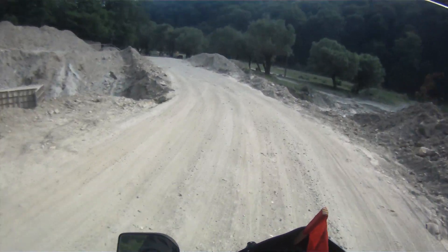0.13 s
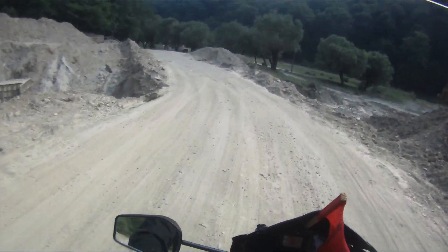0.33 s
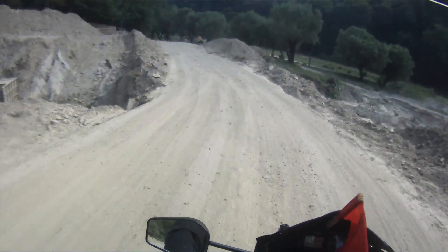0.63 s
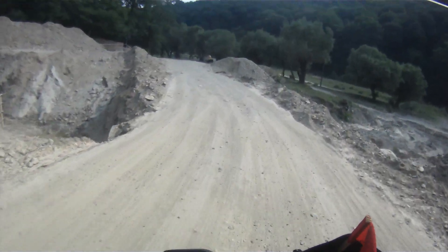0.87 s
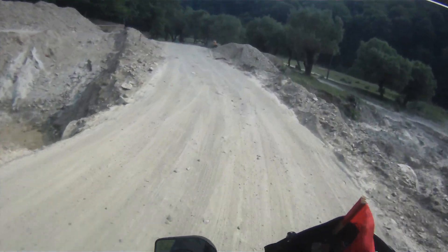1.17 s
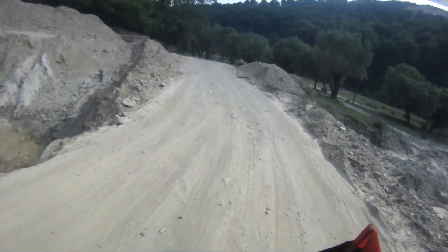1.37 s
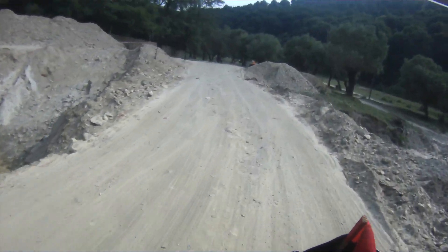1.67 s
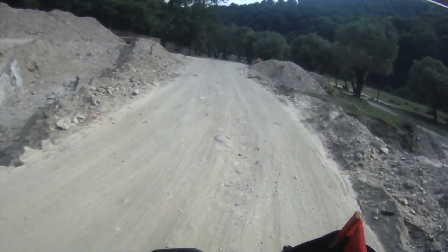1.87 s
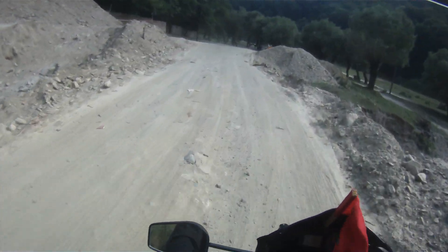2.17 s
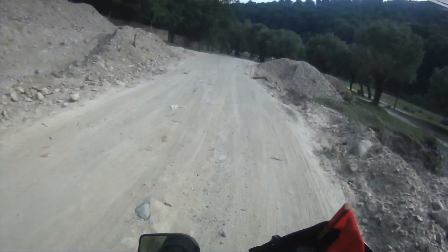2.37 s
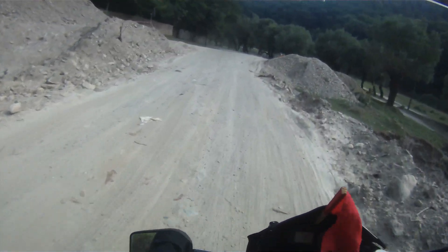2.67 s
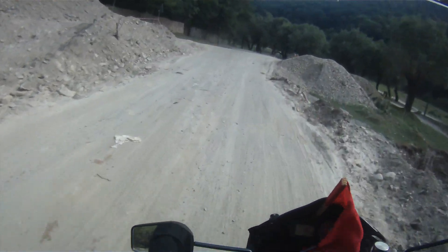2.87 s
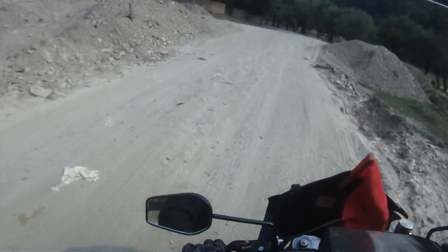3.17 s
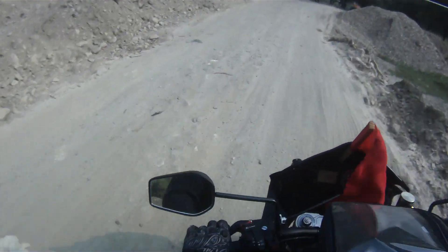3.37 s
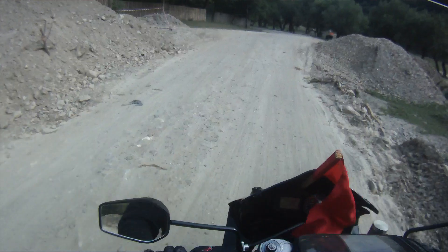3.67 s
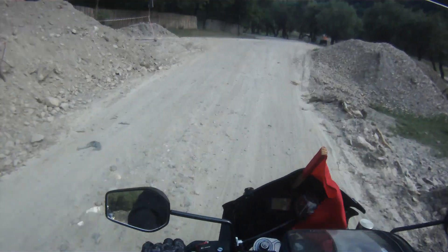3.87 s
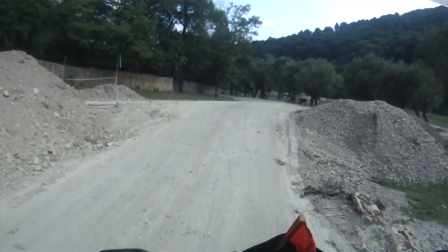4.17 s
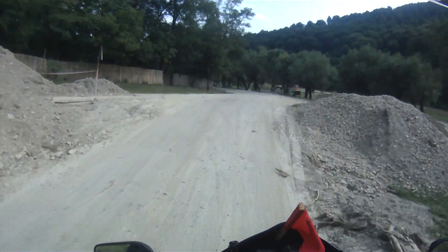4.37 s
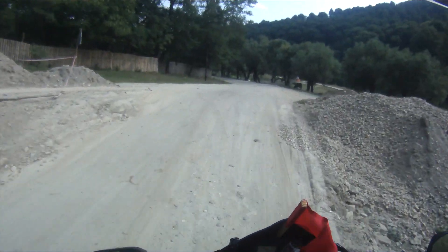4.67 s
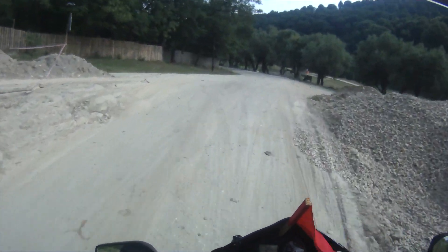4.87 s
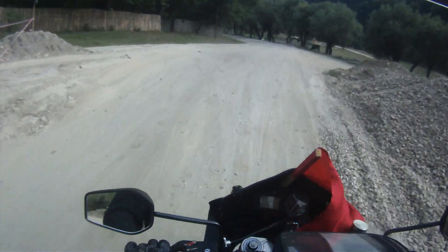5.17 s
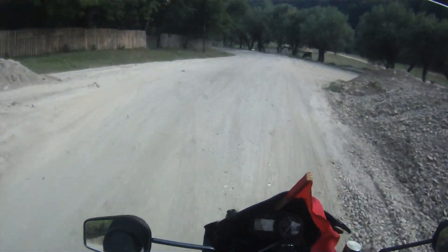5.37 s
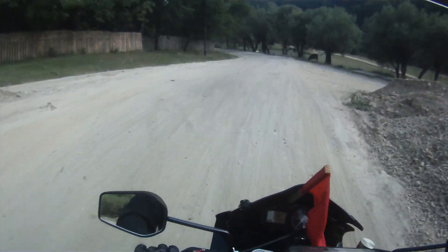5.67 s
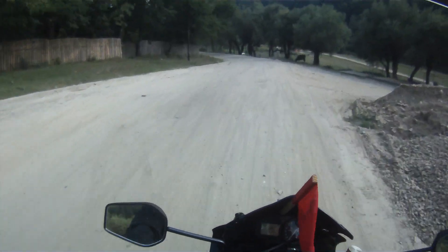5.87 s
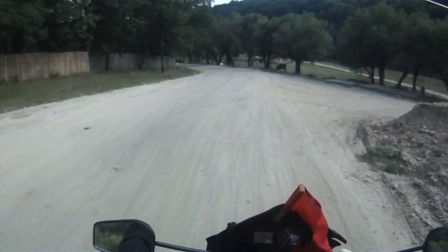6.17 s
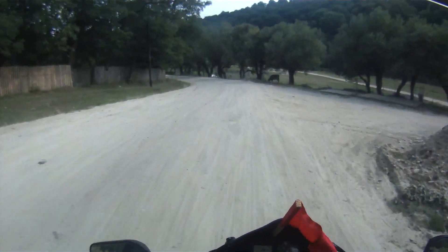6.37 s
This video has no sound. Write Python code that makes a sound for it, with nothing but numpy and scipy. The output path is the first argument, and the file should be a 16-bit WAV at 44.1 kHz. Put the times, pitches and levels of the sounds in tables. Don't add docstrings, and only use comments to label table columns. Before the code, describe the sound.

A motorcycle putters and stumbles along a gravel road, then pulls cleanly to a higher note before dropping off amid rattling bumps.

```python
import sys
import numpy as np
from scipy import signal
from scipy.fft import rfft, irfft, next_fast_len
from scipy.io import wavfile
from scipy.ndimage import uniform_filter1d, map_coordinates

SR = 44100
rng = np.random.default_rng(int(sys.argv[2]) if len(sys.argv) > 2 else 0)


def pcm_store(signal):
    levels = np.round(np.clip(np.atleast_2d(signal), -1, 1) * 32767)
    wavfile.write(sys.argv[1], SR, levels.astype(np.int16).T)


def field_ratio(decibels):
    return 10 ** (np.asarray(decibels, dtype=float) / 20)


N = 287084

# time in seconds, firings a second.
ENGINE_SPEED = [(0.0, 42.46), (0.667, 42.92), (1.068, 44.4), (1.139, 39.85), (1.93, 42.85), (2.009, 41.74),
                (2.173, 44.76), (3.287, 55.64), (3.523, 53.69), (3.618, 66.1), (3.767, 70.32),
                (4.041, 69.88), (4.223, 63.98), (4.353, 67.64), (5.296, 73.74), (5.373, 72.61),
                (6.084, 72.08), (6.51, 35.8)]
FIRST_TURN = .3778
# time in seconds, peak of a puff in dB, lead of the stronger cylinder in dB.
THROTTLE = [(0.0, -15, -0.8), (0.5, -15, -1.6), (1.1, -17.5, 2.5), (1.9, -16.5, 1.2), (2.6, -15, 0),
            (3.1, -14, 0.7), (3.5, -15, -1.6), (3.65, -11.5, 1), (4.05, -13.5, 0.5), (4.25, -17.5, 1.1),
            (4.45, -14.5, 1.5), (5.13, -16.5, 1.6), (5.19, -13.5, 3), (5.45, -13.5, 0), (6.122, -14, 1),
            (6.14, -29, 5.5), (6.3, -16.5, 0.5), (6.51, -19.5, 1.4)]
# time in seconds, change in dB.
ODD_FIRINGS = [(.062, -7), (0.131, -13), (.183, 4), (.295, 8), (.342, -5), (0.436, -8), (.668, 7),
               (.765, 4), (0.809, -6), (1.036, -8), (1.105, -7), (1.229, 6), (1.254, 8), (1.353, -5),
               (1.378, 6), (1.426, -9), (1.643, 5), (1.834, 5), (1.928, -6), (2.184, 6), (2.61, -5),
               (2.651, 4), (2.77, -7), (2.926, -6), (3.002, 9), (3.023, 3), (3.041, 4), (3.189, -4),
               (3.225, -14), (3.243, 7), (3.298, -4), (3.315, -8), (3.333, 5), (3.37, 7), (3.387, 9),
               (3.46, -9), (3.499, 4), (3.516, -8), (3.535, 10), (3.793, 3), (3.85, 3), (4.469, -3),
               (4.571, 3), (5.148, -7), (5.162, -30), (5.177, 2), (5.245, 3), (5.451, -3), (5.477, -6),
               (5.7, 4), (5.85, 3), (6.128, -20), (6.144, -8), (6.33, -6), (6.348, -3), (6.369, 5),
               (6.391, -4), (6.416, 3), (6.461, -24), (6.503, 2)]
# time in seconds, change in dB.
MORE_ODD_FIRINGS = [(.159, -5), (.39, -0.5), (.484, 2), (.558, 1.5), (.623, -1.5), (.742, -1), (.926, -2.5),
                    (.949, 5), (1.058, 0), (1.08, -4), (1.23, 6), (1.254, -1), (1.476, -5), (1.574, -1),
                    (1.62, 3), (1.718, 1.5), (1.764, 5), (1.996, 2), (2.093, -1), (2.274, 2), (2.381, 4),
                    (2.402, 1.5), (2.672, -2.5), (2.73, 2.5), (2.949, 0), (3.096, 8), (3.134, -4.5),
                    (3.298, 0), (3.482, -1), (3.554, 4), (3.571, 1.5), (3.634, -1.5), (3.648, -2),
                    (3.663, -2.5), (3.678, -2), (4.276, 1.5), (4.305, -2.5), (4.321, -0.5), (4.398, 2),
                    (4.543, -2.5), (4.571, -4.5), (4.787, -1.5), (4.857, 1), (4.886, 0), (4.898, 3.5),
                    (5.065, 4), (5.136, 2), (5.204, 4), (5.233, 5), (5.299, -4.5), (5.326, -2.5), (5.423, 3),
                    (5.52, 2), (5.562, 2.5), (5.687, -2), (5.99, -0.5), (6.047, -1.5), (6.061, 0.5),
                    (6.102, -5), (6.182, -4)]
# pitch at idle in Hz, rise in Hz per firing a second, rise in ms, fall in ms.
MUFFLER = (259.2, 0.9, 3.01, 3.17)
# level in dB, multiple of the muffler pitch, width in ms.
VALVE_RASP = (-22, 2.6, 0.33)
# multiple of the firing rate, dB against the puff, lag in turns,
# pipe delay in ms, dB per firing a second above cruise.
LOW_ORDERS = [
    (1, -21, -0.31, 7.1, 0),
    (2, -20.5, -0.0032, 2.8, -1),
]
LOW_DB = (-1, 0.3, -2)
# pitch in Hz, level in dB per Hz.
BOOM_COLOUR = [(30, -44.5), (45, -16.5), (65, -11.5), (110, 5), (150, 3.5), (210, -9.5), (300, -19),
               (400, -53)]
BOOM_DB = (-37.5, -44.5, -40.5)
# time in seconds, share of the stumble from 0 to 1,
# surge of the shaft in firings.
HUNTING = [
    (0, 1, .05),
    (1.05, 1, .095),
    (1.15, 1, .03),
    (2, 1, -.01),
    (2.3, 1, .06),
    (2.7, 1, -.05),
    (3.5, 1, .01),
    (3.6, 0, 0),
    (6.51, 0, 0),
]
STUMBLE_DB = [
    1.5,
    -.7,
    .4,
    -2.5,
    1.8,
    -12,
    -6.5,
    -.6,
]
SLIP_S, SLIP = 3.04, 4
SURGE_LAG, SCATTER_DB = .31, 1.4
# opens, is open, starts to close, is shut, each in seconds.
PULL = (3.55, 3.7, 6.1, 6.2)
# depth in firings, rate in Hz, lag in turns.
CHAIN_ROCK = (.049, 1.9877, .309)
JUDDER = (.008, 9)
# time in seconds, lead in firings.
RUTS = [(0.02, 0.044), (0.13, -0.128), (0.24, -0.063), (0.35, 0.095), (0.46, -0.019), (0.57, -0.027),
        (0.68, 0.03), (0.79, -0.012), (0.9, 0.033), (1.01, -0.06), (1.12, 0.064), (1.23, -0.015),
        (1.34, 0.054), (1.45, -0.028), (1.56, -0.053), (1.66, 0.115), (1.77, -0.056), (1.88, -0.019),
        (1.99, 0.012), (2.1, 0.016), (2.21, -0.014), (2.43, -0.009), (2.54, -0.053), (2.65, 0.037),
        (2.76, 0.006), (2.87, -0.078), (2.98, -0.047), (3.09, 0.01), (3.31, -0.009), (3.53, -0.021),
        (3.64, -0.004), (3.75, -0.028), (3.86, -0.006), (3.97, -0.026), (4.08, -0.0), (4.19, -0.021),
        (4.3, -0.009), (4.41, 0.0), (4.52, 0.031), (4.63, -0.011), (4.74, -0.047), (4.85, -0.035),
        (4.95, -0.031), (5.06, -0.039), (5.17, 0.004), (5.28, -0.055), (5.39, -0.01), (5.5, -0.032),
        (5.61, -0.04), (5.72, -0.096), (5.83, 0.023), (5.94, -0.01), (6.05, -0.097), (6.16, 0.02),
        (6.27, 0.023), (6.31, 0.0), (6.36, 0.17), (6.425, -0.15), (6.48, 0.0), (6.51, 0.6)]
# time in seconds, roar in dB.
ROUGHNESS = [(0, -31.5), (.6, -31), (.95, -32.5), (1.3, -34), (2, -33), (2.55, -31.5), (2.88, -31),
             (3.5, -32), (3.79, -40), (4.17, -33.5), (4.97, -31.5), (5.24, -30.5), (5.48, -34),
             (5.97, -34.5), (6.16, -31.5), (6.33, -29), (6.51, -28.5)]
AVERAGE_ROAD_DB = -34.5
# pitch in Hz, level in dB per Hz.
ROAR_COLOUR = [(100, -31.5), (190, -4.5), (300, 1.5), (450, -3), (600, -7), (850, -11.5), (1300, -19),
               (2000, -38), (4000, -65.5)]
# pitch in Hz, level in dB per Hz.
CRUNCH_COLOUR = [(500, -27.5), (1000, 1.5), (1700, 2.5), (2100, -2), (2700, -13.5), (3200, -19),
                 (3800, -28.5), (5000, -47.5), (8000, -71)]
# pitch in Hz, level in dB per Hz.
HISS_COLOUR = [(2600, -29), (3050, 5.5), (3250, 12), (3500, -0.5), (4200, -1.5), (4950, -6.5), (5300, -4),
               (5500, 0.5), (5750, -2.5), (6200, -3), (6700, -10.5), (7500, -15.5), (9000, -32)]
# pitch in Hz, level in dB per Hz.
AIR_COLOUR = [(5000, -19), (7000, -2), (9500, -3.5), (12000, -4.5), (15200, -12.5), (15500, -49.5)]
# coasting, pulling and shut off in dB, then dB per dB of road.
CRUNCH_LAW = (-50, -50.5, -49, 0.5)
HISS_LAW = (-71.5, -74.5, -73, -0.03)
AIR_LAW = (-79, -83.5, -83, 0.16)
# grains a second, spread of size in dB, share from 0 to 1.
ROAR_GRAINS = (900, 2.5, .16)
GAP = .38
TIGHT = .35
CLEARED = (.15, 0, .4)
MISSED_DB = 30
# time in seconds, peak in dB, pitch in Hz, brightness in dB,
# time to fade by 60 dB in seconds.
BUMPS = [(0.392, -27.5, 630, -8.5, 0.12), (.605, -22.5, 800, -21, 0.068), (1.087, -22.5, 770, -10, 0.053),
         (1.117, -24, 960, -5, .03), (1.132, -15.5, 500, -10.5, 0.068), (1.1379, -14.5, 755, -8.5, 0.037),
         (1.143, -14, 478, -5.5, 0.047), (1.183, -22, 646, -19, 0.036), (1.4207, -23, 900, 3, 0.028),
         (1.423, -15.5, 596, -13, 0.16), (1.594, -20, 507, 8, .04), (1.651, -16, 610, -9.5, 0.04),
         (2.061, -23, 600, -5, 0.02), (2.576, -23.5, 525, -12, 0.02), (2.71, -20.5, 600, -10.5, 0.18),
         (2.885, -20.5, 530, -19.5, 0.16), (3.525, -30.5, 580, -11, 0.13), (4.0898, -23.5, 584, -1, 0.03),
         (4.353, -21.5, 600, 0, 0.028), (4.661, -19.5, 550, -3, 0.03), (4.7684, -17.5, 543, -8, 0.04),
         (5.415, -17, 536, -15.5, 0.045), (6.347, -16.5, 565, -5, 0.1), (6.361, -19, 630, -1, .08),
         (6.377, -16, 606, -7.5, 0.086), (6.392, -14.5, 716, -4, 0.13), (6.404, -17, 800, -1.5, .08),
         (6.419, -20, 650, -3, .06), (6.436, -26, 600, -5, .04), (6.458, -25.5, 626, -4.5, 0.05),
         (6.471, -17, 645, -3, 0.061)]
KNOCK = 3
STEEL_DB, JOLTED_DB = -61, -52
JOLTS = [
    1.412,
    1.649,
    6.394,
]
# time in seconds, peak in dB, 60 dB fade in seconds, top pitch in Hz.
TICKS = [(.487, -40, 0.0088, 7450), (.709, -36.5, 0.0098, 12000), (1.236, -49, 0.025, 11040),
         (3.1334, -23.5, 0.0013, 15300), (2.501, -52.5, 0.0069, 6920), (3.386, -47, 0.012, 9000),
         (3.5556, -21.5, 0.0012, 13200), (1.649, -51.5, .01, 6960), (6.224, -48.5, .02, 6500),
         (6.395, -44.5, 0.022, 7200), (6.405, -47.5, .03, 6450), (6.5096, -17.5, 0.004, 40400)]
# time in seconds, peak in dB, pitch in Hz, width in Hz,
# 60 dB fade in seconds.
GRAVEL_SNAPS = [(.597, -37, 2100, 500, .03), (.835, -58, 6000, 1500, .02), (1.142, -58, 5500, 1200, .03),
                (1.238, -40, 1900, 700, .03), (1.239, -60, 6500, 2500, .02), (1.4205, -37, 2600, 1300, .03),
                (1.421, -56, 5800, 1100, .03), (.484, -50, 5400, 2500, .012), (1.651, -51, 5750, 900, .025),
                (1.651, -46, 2700, 1300, .02), (3.6267, -48, 3300, 1500, .015),
                (4.064, -51, 3300, 1500, .015), (5.196, -51, 3400, 1200, .02),
                (5.295, -60, 6000, 1500, .02), (6.394, -44, 3200, 1800, .025)]
# time in seconds, peak in dB.
VALVE_TAPS = [(0.0338, -49), (0.1273, -49), (0.2242, -51), (0.3142, -52), (0.4095, -48.5), (0.5044, -49.5),
              (0.5975, -47), (0.6883, -47), (0.7831, -49.5), (0.8734, -50), (0.9673, -49), (1.0545, -55),
              (1.1523, -46), (1.2494, -54), (1.3394, -50.5), (1.5474, -52), (1.6402, -50.5),
              (1.7374, -49.5), (1.8323, -51.5), (1.925, -52), (2.0203, -50), (2.1121, -47.5),
              (2.2036, -51.5), (2.2907, -49.5), (2.375, -51.5), (2.4632, -50), (2.5446, -51),
              (2.627, -50.5), (2.7048, -53), (2.7861, -49.5), (2.865, -50), (2.9404, -56), (3.018, -52.5),
              (3.0926, -52), (3.239, -53), (3.3104, -50), (3.3837, -48.5), (3.457, -51)]
# trim in dB, pitch in Hz, width in Hz, 60 dB fade in seconds.
VALVE_RING = (1.5, 3300, 900, .016)
# start in seconds, length in seconds, pitch in Hz, level in dB.
BUZZES = [(0, .1, 985, -41), (.1, .04, 913, -41), (.15, .04, 997, -45), (.18, .12, 1104, -39.5),
          (0.314, .14, 960, -41), (0.505, 0.1, 961, -41), (0.583, 0.11, 1100, -42), (.67, 0.12, 957, -39.5),
          (.75, 0.11, 1100, -35), (0.882, .07, 1030, -38), (.94, .11, 1100, -33.5),
          (1.103, 0.13, 931, -40.5), (1.213, 0.18, 963, -41.5), (1.392, .12, 955, -42.5),
          (1.953, 0.14, 958, -40), (2.077, 0.13, 1112, -36.5), (2.213, 0.1, 1121, -36),
          (2.345, 0.14, 1102, -36), (2.531, 0.052, 1127, -36), (2.59, 0.061, 1155, -43),
          (2.7, .08, 1153, -41.5), (2.87, .1, 1240, -45), (.01, .04, 1910, -50), (.1, 0.047, 1915, -48.5),
          (1.16, .09, 1824, -47.5), (1.29, .07, 1830, -47), (1.43, .09, 1820, -48), (2.28, .08, 1780, -49),
          (3.61, 0.043, 950, -41.5), (3.668, 0.14, 748, -40.5), (3.82, 0.17, 750, -46.5),
          (3.844, 0.12, 1000, -46), (3.99, 0.14, 990, -47)]
BUZZ_WAVER = (.17, 60)
# time in seconds, whine in dB.
WHINE = [(0, -57), (2, -58), (2.5, -58), (2.9, -53), (3.25, -45), (3.53, -50), (3.585, -42), (3.64, -44),
         (3.72, -55), (3.86, -55), (3.91, -48), (4.1, -44.5), (4.62, -46), (4.85, -44.5), (5.22, -45),
         (5.28, -57), (5.33, -46), (5.7, -45.5), (5.85, -49), (6.1, -51), (6.2, -58)]
TEETH, MESH_DB, OVERTONE_DB = 24.08, 5, -26
# pitch in Hz, width in Hz, gain in dB.
RINGING_PANELS = [
    (949, 210, 13),
    (1055, 230, 11),
]
HELMET_DB = -0.42
# pitch in Hz, level in dB per Hz.
MIC_NOISE = [(200, -20.5), (3000, -7), (7000, 3), (9500, 2), (12000, -4), (15000, -9)]
# from and to in seconds, edge in Hz.
NARROWED = (3.585, 6.2, 12900)


def unit(x):
    return x / np.sqrt(np.mean(x ** 2) + 1e-20)


def curves(rows):
    s, *cols = np.transpose(rows)
    return [np.interp(np.arange(N) / SR, s, c, right=c[-1]) for c in cols]


def wobble(rate):
    knots = rng.standard_normal(int(N * rate / SR) + 4)
    return map_coordinates(knots, [np.arange(N) * rate / SR])


def filtered(x, response):
    m = next_fast_len(len(x) + SR // 2)
    return irfft(rfft(x, m) * response(np.fft.rfftfreq(m, 1 / SR)), m)[:len(x)]


def colour(x, points):
    f, db = np.transpose(points)

    def response(hz):
        return field_ratio(np.interp(np.log(hz + 1), np.log(f), db, left=-120, right=-120))
    return unit(filtered(x, response))


def peak(f, hz, width):
    return 1j * f * width / (hz * hz - f * f + 1j * f * width)


def grains(rate, spread_db, share):
    struck = rng.random(N) < rate / SR
    size = field_ratio(spread_db * np.minimum(rng.exponential(size=N), 2.5))
    hits = struck * rng.standard_normal(N) * size
    return np.sqrt(1 - share) * rng.standard_normal(N) + np.sqrt(share) * unit(hits)


def by_throttle(coasting, pulling, shut):
    return np.interp(np.arange(N) / SR, PULL, [coasting, pulling, pulling, shut])


def shaft():
    even = FIRST_TURN + np.cumsum(curves(ENGINE_SPEED)[0]) / SR
    depth, rate_hz, lag = CHAIN_ROCK
    rock = by_throttle(0, depth, 0) * np.sin(2 * np.pi * (rate_hz * np.arange(N) / SR - lag))
    ruts = uniform_filter1d(curves(RUTS)[0], size=SR // 30)
    shake_depth, shake_rate = JUDDER
    surge = curves(HUNTING)[1] * np.sin(2 * np.pi * (even / len(STUMBLE_DB) - SURGE_LAG))
    return even + rock + ruts + shake_depth * wobble(shake_rate) + surge


def follow_road(law):
    *levels, per_db = law
    return by_throttle(*levels) + per_db * (curves(ROUGHNESS)[0] - AVERAGE_ROAD_DB)


def air_and_chain_hiss(shared):
    fine = 0.44 * shared + 1.5 * wobble(60)
    hiss = field_ratio(follow_road(HISS_LAW) + 5.5 + fine) * colour(grains(1200, 3, share=.15), HISS_COLOUR)
    air = field_ratio(follow_road(AIR_LAW) + fine) * colour(grains(900, 3, share=.15), AIR_COLOUR)
    return hiss + air


def gravel_crunch(beat, push, shared):
    level_db = follow_road(CRUNCH_LAW) + 7.0 + 0.21 * push
    level_db += 0.96 * shared + 0.88 * wobble(50) + 0.5 * beat
    return field_ratio(level_db) * colour(grains(1500, 1, share=0.33), CRUNCH_COLOUR)


def case_roar(beat, push, shared):
    missed = np.minimum(push, 0)
    level_db = curves(ROUGHNESS)[0] + 5.0 + GAP * missed
    level_db += 0.5 * shared + 0.81 * wobble(55) + 0.15 * beat
    roar = field_ratio(level_db) * colour(grains(*ROAR_GRAINS), ROAR_COLOUR)
    roar = roar - by_throttle(0, TIGHT, 0) * filtered(roar, lambda f: peak(f, 99, 190))
    emptied = np.clip(by_throttle(*CLEARED) - missed / MISSED_DB, 0, 1)
    return roar - emptied * filtered(roar, lambda f: peak(f, 320, 200))


def rolling(turns, push):
    beat = np.cos(2 * np.pi * (turns - .15))
    shared = wobble(14)
    return case_roar(beat, push, shared) + gravel_crunch(beat, push, shared) + air_and_chain_hiss(shared)


def ticks():
    out, t = np.zeros(N + SR), np.arange(SR // 20) / SR
    for s, db, t60, top_hz in TICKS:
        rough = .5 * rng.standard_normal(len(t)) * (t60 > .005)
        snap = field_ratio(-60 * t / t60) * (1 + rough)
        out[round(s * SR):][:len(t)] += field_ratio(db) * filtered(snap, lambda f: 1 / (1 + 1j * f / top_hz) ** 2)
    return out[:N]


def steel_clinks(rows):
    out, t = np.zeros(N + SR), np.arange(SR // 20) / SR
    for s, db, hz, width, t60 in rows:
        burst = rng.standard_normal(len(t)) * field_ratio(-60 * t / t60)
        snap = filtered(burst, lambda f: peak(f, hz, width) ** 3)
        out[round(s * SR):][:len(t)] += field_ratio(db) * snap / abs(snap).max()
    return out[:N]


def gravel_snaps():
    return steel_clinks(GRAVEL_SNAPS)


def valve_taps():
    trim_db, *ring = VALVE_RING
    return steel_clinks([(s, db + trim_db, *ring) for s, db in VALVE_TAPS])


def bumps():
    out, t = np.zeros(N + SR), np.arange(SR // 5) / SR
    for s, db, hz, bright_db, t60 in BUMPS:
        jolted = min(abs(s - np.array(JOLTS))) < .01
        steel_db = JOLTED_DB if jolted else STEEL_DB
        shake = rng.standard_normal(len(t)) * field_ratio(-60 * t / t60) * (1 - np.exp(-t / 0.00071))
        blow = shake + KNOCK * np.exp(-.5 * ((t - .0005) / .00012) ** 2)

        def frame(f):
            modes = peak(f, hz, 140) ** 2 + field_ratio(bright_db) * peak(f, 1100, 1300) ** 2
            return modes / (1 + (f / 2500) ** 6)

        def steel(f):
            return field_ratio(steel_db) * (peak(f, 5300, 900) ** 2 + 7 * peak(f, 1400, 1300) ** 2)
        body = filtered(blow, frame) + filtered(shake, steel)
        out[round(s * SR):][:len(t)] += field_ratio(db) * body / abs(body).max()
    return out[:N]


def buzzes():
    out, t = np.zeros(N), np.arange(N) / SR
    depth, rate = BUZZ_WAVER
    waver = depth * wobble(rate)
    flutter = field_ratio(3 + 1.6 * wobble(60))
    for s, length, hz, db in BUZZES:
        part = slice(round(abs(s) * SR), round((abs(s) + length) * SR))
        swell = np.sqrt(abs(np.sin(np.pi * (t[part] - s) / length)))
        tone = np.sin(2 * np.pi * (hz * t[part] + waver[part]))
        out[part] += field_ratio(db) * swell * flutter[part] * tone
    return out


def gears(turns):
    blur = np.cumsum(26 * wobble(90) + 10 * wobble(22)) / SR
    load = 1 + 0.3 * np.cos(2 * np.pi * turns)
    phase = 2 * np.pi * (TEETH * turns + blur)
    tone = np.sin(phase) + field_ratio(OVERTONE_DB) * np.sin(2 * phase)
    mesh = field_ratio(curves(WHINE)[0] + MESH_DB + 1.5 * wobble(30)) * load * tone

    def panels(f):
        return 1 + sum(field_ratio(db) * peak(f, hz, width) ** 2 for hz, width, db in RINGING_PANELS)
    return filtered(mesh, panels)


def firings(turns):
    count = np.arange(1, int(turns[-1]) + 2)
    at = np.interp(count, turns, np.arange(N))
    i = at.astype(int)
    level_db, lead_db = curves(THROTTLE)
    luck = rng.standard_normal((len(count), 3))
    place = (count + SLIP * (at > SLIP_S * SR)) % len(STUMBLE_DB)
    stumble_db = curves(HUNTING)[0][i] * np.array(STUMBLE_DB)[place]
    size_db = level_db[i] + lead_db[i] * (-1.) ** count + stumble_db + SCATTER_DB * luck[:, 0]
    for s, db in ODD_FIRINGS + MORE_ODD_FIRINGS:
        size_db[np.argmin(abs(at - s * SR))] += max(db, -26)
    return at, size_db, luck


def muffler_puffs(at, size_db, luck):
    i = at.astype(int)
    idle_hz, rise_hz, rise_ms, fall_ms = MUFFLER
    hz = (idle_hz + rise_hz * curves(ENGINE_SPEED)[0][i]) * (1 + 0.0042 * luck[:, 2])
    span = np.arange(-500, 500)
    ms = (span[None] - (at - i)[:, None]) / SR * 1000 - .2 - .18 * luck[:, 1:2]
    angle = 2 * np.pi * hz[:, None] * ms / 1000
    swell = np.exp(-.5 * (ms / np.where(ms < 0, rise_ms, fall_ms)) ** 2)
    bursts = -field_ratio(size_db)[:, None] * swell * np.cos(angle)
    rasp_db, times, width_ms = VALVE_RASP
    edge = np.exp(-.5 * (ms / width_ms) ** 2) * np.sin(times * angle)
    bursts += field_ratio(size_db + rasp_db)[:, None] * edge
    places = (i[:, None] + span + 500).ravel()
    return np.bincount(places, bursts.ravel(), N + 1000)[500:N + 500]


def low_orders(turns, strength_db):
    speed, = curves(ENGINE_SPEED)
    fast = np.maximum(speed - 69.5, 0)
    low = np.zeros(N)
    for k, db, lag, delay_ms, fade_db in LOW_ORDERS:
        low += field_ratio(db + fade_db * fast) * np.cos(2 * np.pi * (k * turns - lag - delay_ms * speed / 1000))
    return field_ratio(0.88 * strength_db - 3.5 + by_throttle(*LOW_DB)) * low


def exhaust_boom(push):
    level_db = by_throttle(*BOOM_DB) + 0.36 * push + 0.68 * wobble(25)
    return field_ratio(level_db) * colour(rng.standard_normal(N), BOOM_COLOUR)


def exhaust(turns):
    at, size_db, luck = firings(turns)
    strength_db = np.interp(np.arange(N), at, np.clip(size_db, -32, 0))
    push = strength_db - curves(THROTTLE)[0]
    sound = muffler_puffs(at, size_db, luck) + exhaust_boom(push) + low_orders(turns, strength_db)
    return sound, push


def scene():
    turns = shaft()
    pipe, push = exhaust(turns)
    road = rolling(turns, push) + bumps() + ticks() + gravel_snaps()
    machine = valve_taps() + buzzes() + gears(turns) + field_ratio(HELMET_DB) * pipe
    mono = road + machine
    return np.array([mono, mono])


def roll_off(x):
    return signal.sosfilt(signal.butter(12, 15290, fs=SR, output="sos"), x)


def record(dry):
    own = np.array([colour(rng.standard_normal(N), MIC_NOISE) for _ in range(2)])
    tilt = filtered(dry[0], lambda f: 0.01 * peak(f, 330, 400) + .007 * peak(f, 1200, 2500))
    sides = (dry[0] - tilt, dry[1] + tilt)
    housed = np.array([filtered(ch, lambda f: (1j * f / (28 + 1j * f)) ** 2) for ch in sides])
    sound = housed + field_ratio(-81.0) * own
    start, end, edge_hz = NARROWED
    top = np.array([filtered(ch, lambda f: f > edge_hz) for ch in sound])
    fade_times = [start - .01, start + .01, end - .02, end + .02]
    pulling = np.interp(np.arange(N) / SR, fade_times, [0, 1, 1, 0])
    return roll_off(sound - pulling * top)


dry = scene()
out = record(dry)
pcm_store(out)
```